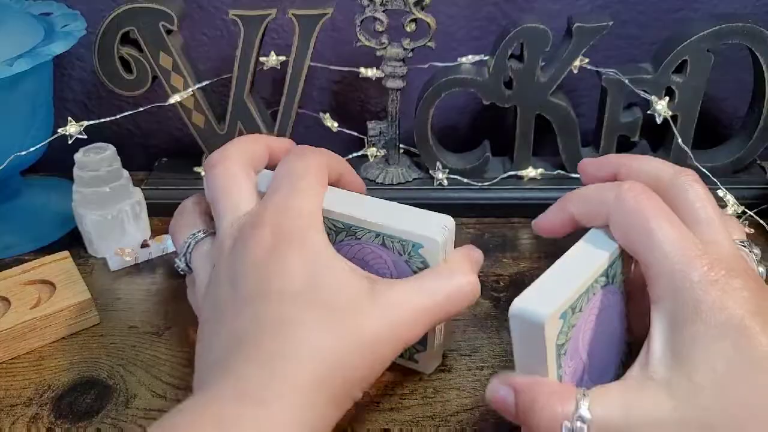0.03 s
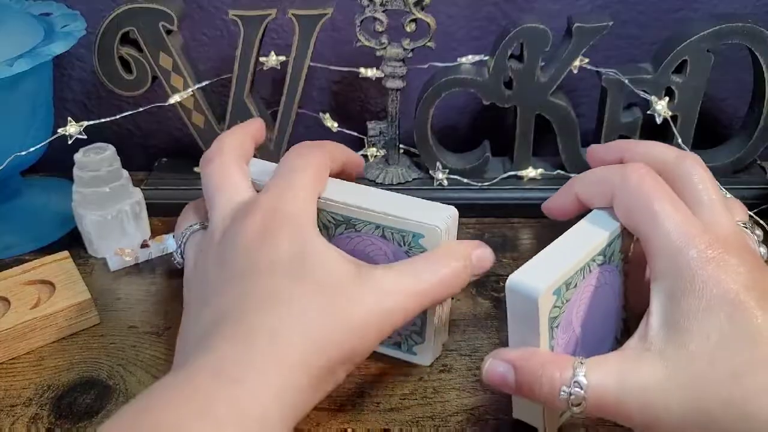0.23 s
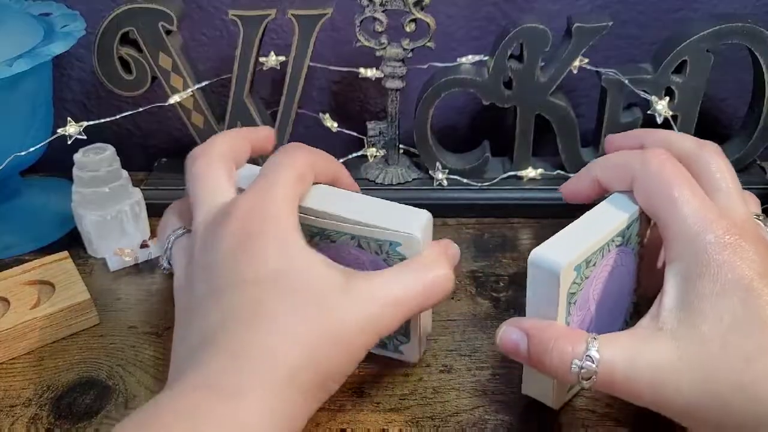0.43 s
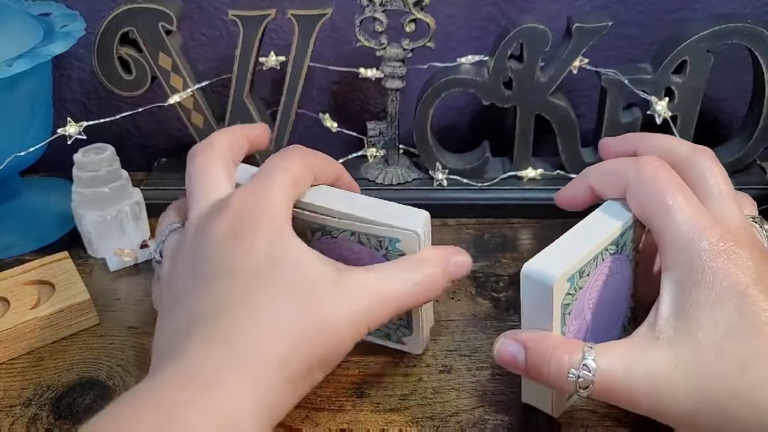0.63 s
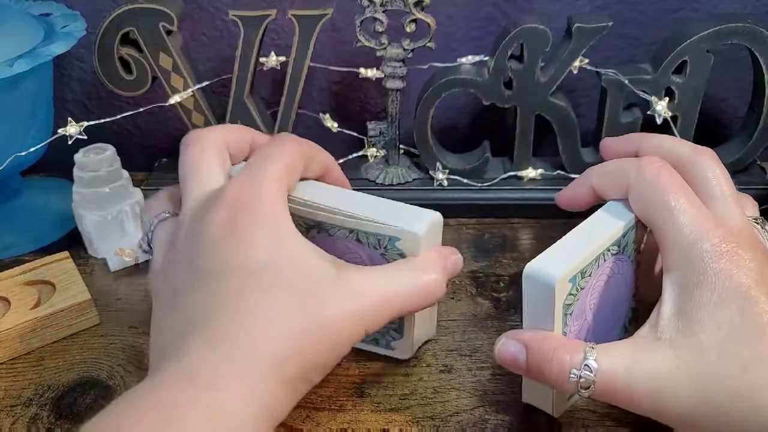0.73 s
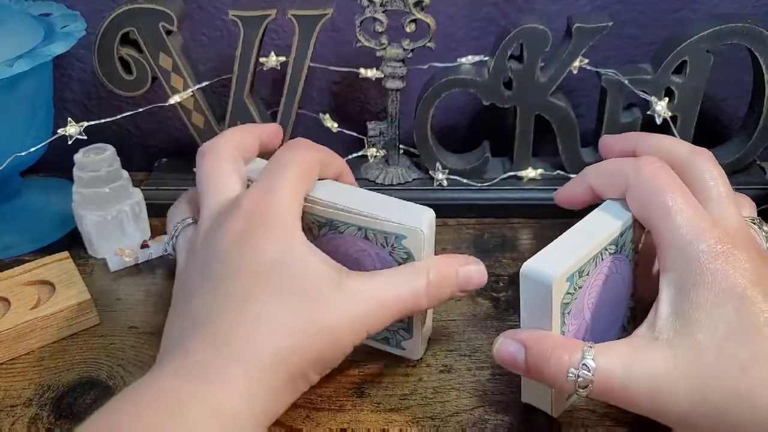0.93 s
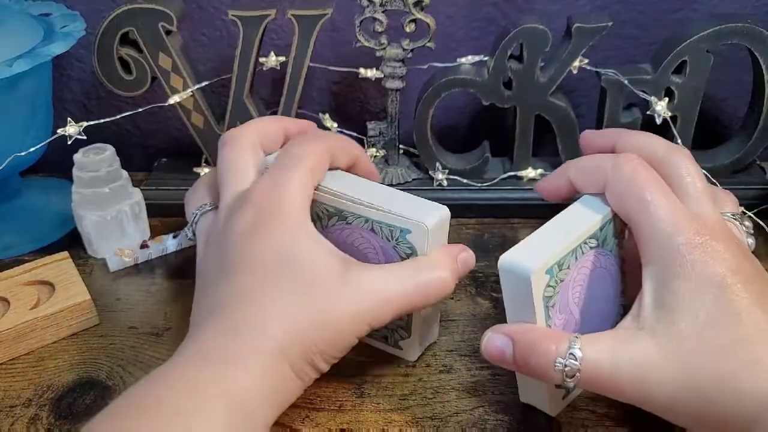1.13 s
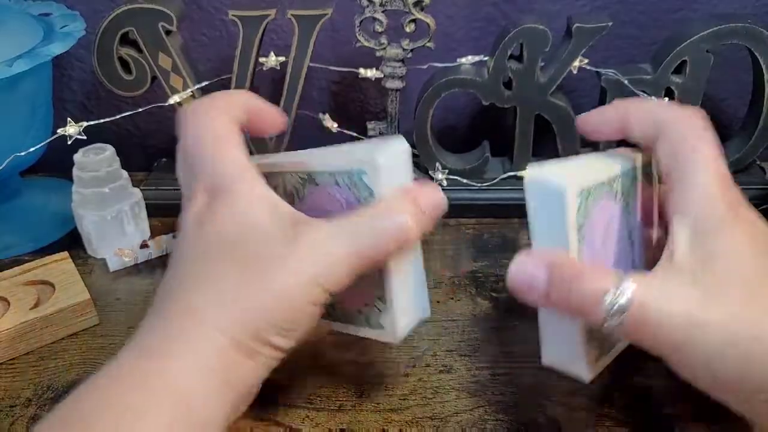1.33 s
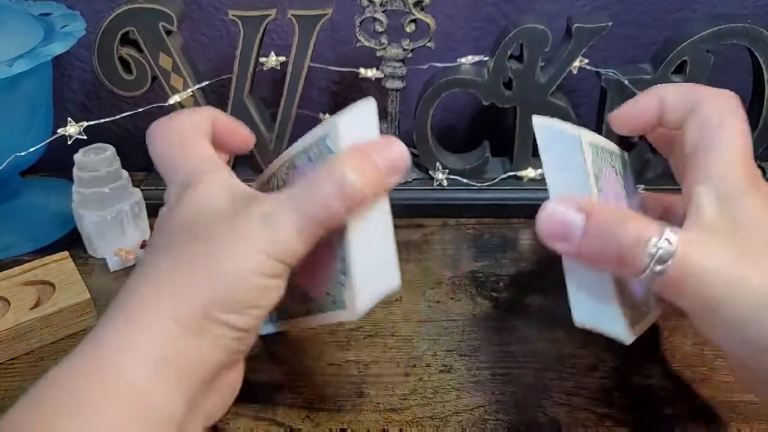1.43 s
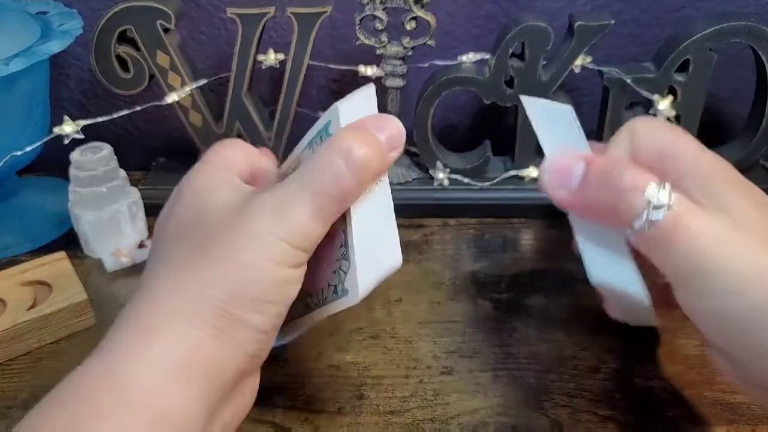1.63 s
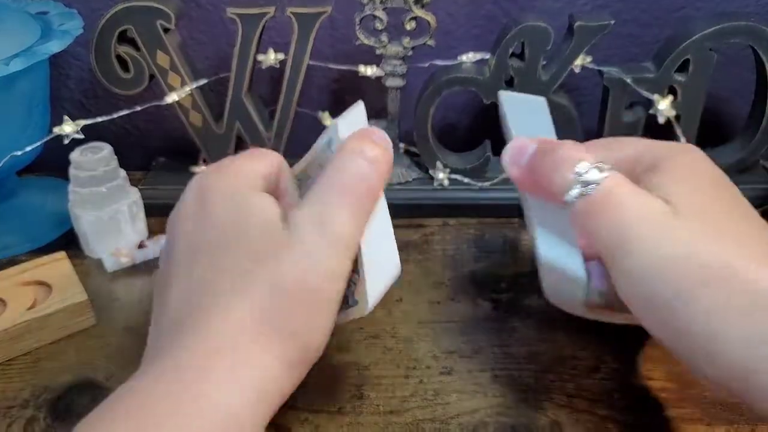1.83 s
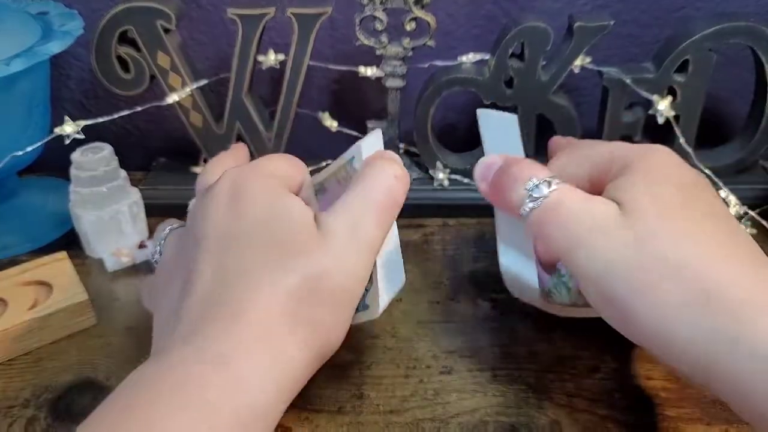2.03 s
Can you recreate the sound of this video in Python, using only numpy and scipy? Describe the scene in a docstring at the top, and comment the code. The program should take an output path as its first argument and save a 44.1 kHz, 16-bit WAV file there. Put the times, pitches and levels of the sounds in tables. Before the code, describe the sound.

Two stacks of cards are knocked on a wooden table three times in quick succession, each a bright clack with a dull thump. Fingers then shift the cards with faint rubbing and ticks, close up in a small, quiet room.

```python
"""Three knocks of two stacks of cards on a wooden table, heard close up in a small, quiet room.
Loose card edges land in a bright clack, then the squared block lands with a dull thump and the
table rings. Between the knocks, fingers shift and the cards rub, squeak, scuff and tick.
A low rumble lies underneath, and a limiter holds down the loudest peaks."""
import sys
import numpy as np
from scipy import signal
from scipy.fft import rfft, irfft, next_fast_len
from scipy.io import wavfile
from scipy.ndimage import uniform_filter1d, minimum_filter1d

SR = 44100
rng = np.random.default_rng(int(sys.argv[2]) if len(sys.argv) > 2 else 0)


def file_out(sig):
    """Save sig as 16-bit WAV at sys.argv[1]."""
    # one column per channel
    cols = np.atleast_2d(sig).T
    # limit, then scale
    lim = np.clip(cols, -1, 1)
    pcm = np.round(lim * 32767).astype(np.int16)
    wavfile.write(sys.argv[1], SR, pcm)


N = 92610  # 2.1 seconds
HIT_GAIN = np.sqrt(SR / 200)  # a hit's level counts its energy as if spread over 5 ms

# The table's ringing notes. Each row: pitch in Hz, relative level in dB, seconds to fade by 60 dB.
TABLE_NOTES = [(133, -0.5, 0.24), (173, -4, .3), (204.5, -1.5, .3), (442, 3, 0.26), (473.7, 8, 0.2),
               (562.5, 1, 0.3), (777, 0, 0.13), (1223, 6, 0.14), (1673, 2.5, 0.21), (1898, 1.5, 0.27),
               (2224, 1, 0.35), (2342, -1, 0.46), (2738, 2, 0.14), (3500, 3.5, 0.21), (6400, 0.5, .28)]
# The landings of the cards. Each row: start in seconds, level in dB, seconds over which the edges hit,
# then bass, low mids, treble, air (the highest treble), chatter and room, all in relative dB, and last
# a list of notes that the grip and the struck spot lift or damp (pitch in Hz, lift in dB).
LANDINGS = [(0.146, -38, 0.00145, 16.5, 0.5, -17, -39, -7, -8, [(1810, 7)]),
            (0.2106, -10.5, 0.0043, -1.5, -9, -0.5, -24.5, -15, -13, [(1270, 10), (1620, 0), (2480, -14),
            (3980, 8)]), (0.2541, -14.5, 0.00095, 5.5, 1.5, -15.5, -32, -0.5, -3.5, [(1230, 11.5),
            (2050, 6), (2480, 17)]), (0.588, -7.5, 0.0051, -17, -5, -0.5, -32, -26, -8.5, [(510, 6),
            (1000, -12), (2750, 4.5), (3850, 3.5)]),
            (0.6013, -11.5, 0.0062, -10, -6.5, -2.5, -17, -14.5, -6, [(1280, 5.5), (2320, 8), (3330, -2),
            (3720, 5.5)]), (0.6344, -14.5, 0.00057, 0.5, -3.5, -21.5, -29, -9.5, -8, [(1280, 14),
            (1880, -17.5), (2520, 5.5)]),
            (0.952, -13.5, 0.003, -3.5, 5.5, -2.5, -33, -8.5, -4, [(1420, 13.5), (1800, -10), (2270, -12),
            (2650, 10), (3600, 9)]), (0.962, -23.5, 0.0089, 4, 0, 3, -7.5, 1, 0, [(6130, 5)]),
            (0.9658, -10.5, 0.0015, -3.5, -6.5, 0, -32, -16.5, -7.5, [(1100, -12), (1895, 12), (3070, 6),
            (3510, 10.5)]), (0.986, -20, 0.0019, 12.5, 8.5, -0.5, -17, -27, -3.5, [(330, 11)])]


def knocks():
    """Each landing is a cluster of tiny hits that rings the cards, the table and the room."""
    out, t = np.zeros(N), np.arange(SR // 2) / SR
    graze_s, graze_db, ring_db, room_delay_s = 0.0013, -17, -55, 0.004
    for start, db, spread_s, bass, low, treble, air, chatter_db, room_db, notes in LANDINGS:
        contact = contact_pulse(bass, low, treble, air, notes, note_share=0.96)
        # The bass swells in the table and room. The room hears all sides, so the notes count less.
        radiated = contact_pulse(bass + 5.5, low, treble, air, notes, note_share=0.39)
        clack = norm(signal.fftconvolve(contact, card_edges(spread_s, chatter_db)))
        ring = sum(amp(level + rng.normal(0, 2.0) - 60 * t / fade_s) * np.sin(2 * np.pi * hz * t)
                   for hz, level, fade_s in TABLE_NOTES)
        # The lowest cards brush the wood just before the landing.
        brush = rng.standard_normal(512)[:int(graze_s * SR)]
        graze = norm(signal.fftconvolve(contact, brush * np.linspace(0, 1, len(brush))))
        gain = amp(db) * HIT_GAIN
        add(out, start - graze_s, gain * amp(graze_db) * graze)
        add(out, start, gain * clack)
        add(out, start, gain * amp(ring_db) * signal.fftconvolve(radiated, ring))
        add(out, start + room_delay_s, gain * amp(room_db) * room_echo(radiated))
    return out


def contact_pulse(bass, low, treble, air, notes, note_share):
    """One touch of cards on wood, with its own balance of low and high sound and its own notes."""
    tone = [(50, bass - 16.5), (90, bass - 8), (130, bass - 1), (200, bass - 1),
            (300, (bass + low) / 2 - 4), (480, low), (850, low), (1250, 0), (2100, 0),
            (3000, treble), (3900, treble + 1), (4550, (treble + air) / 2 + 1),
            (8000, air + 4), (13000, air - 24), (16000, air - 33)]
    return norm(stack_pulse(tone, [(hz, 73 + 0.029 * hz, note_share * lift) for hz, lift in notes]))


def card_edges(spread_s, chatter_db, size=2048):
    """Card edges hit one after another, then chatter briefly as they settle."""
    t = np.arange(size) / SR
    hits = clicks(size, per_second=5900) * (t < spread_s) * amp(-4 * t / spread_s)
    hits[0] = 1
    settle_s = 0.017
    chatter = rng.standard_normal(size) * amp(-60 * t / settle_s)
    spectrum = rfft(norm(hits) + amp(chatter_db) * norm(chatter))
    nearby_power = np.abs(uniform_filter1d(np.abs(spectrum) ** 2, size=9))
    return irfft(spectrum / np.sqrt(nearby_power))[:size // 2]  # even out the tone


# The short, hollow notes of a stack on wood. Each row: pitch in Hz, width in Hz, lift in dB.
STACK_NOTES = [(516, 180, 5), (854, 120, 8.5), (1330, 220, 1), (1795, 270, 4.5), (2133, 49, 3.5),
               (2854, 430, 2), (3920, 370, 0), (5390, 1000, 6.5)]


def stack_pulse(tone, notes=(), size=2048):
    """A sharp click with the given tone, coloured by the stack's hollow notes and any extra ones."""
    hz = np.fft.rfftfreq(size, 1 / SR)
    lifts = sum(lift * np.exp(-((hz - pitch) / width) ** 2)
                for pitch, width, lift in [*STACK_NOTES, *notes])
    # Pack the sound as early as its tone allows (this is called minimum phase).
    cepstrum = irfft(np.log(amp(along(tone, hz) + lifts)))
    cepstrum[1:size // 2] *= 2
    cepstrum[size // 2 + 1:] = 0
    return irfft(np.exp(rfft(cepstrum)))


# The wood's notes under rubbing cards. Each row: pitch in Hz, width in Hz, relative level in dB.
WOOD_NOTES = [(305.6, 22, -7), (442, 22.2, 5), (571, 54, -3), (790, 73, -10.5)]


def wood_response(hz):
    """The table answers rubbing most strongly near its own notes."""
    return sum((-1) ** k * amp(db) * 1j * hz * width / (pitch ** 2 - hz ** 2 + 1j * hz * width)
               for k, (pitch, width, db) in enumerate(WOOD_NOTES))


# The tones of fingers, card edges and card faces. Each row: frequency in Hz, relative level in dB.
THUD_TONE = [(40, -18.5), (90, -12.5), (135, 4.5), (200, 2), (290, 3.5), (420, -12), (750, -46.5),
             (2000, -72.5)]
SCRAPE_TONE = [(400, -35), (750, 4), (1000, 2), (1270, 4), (1580, 3.5), (2200, -4.5), (2450, -7.5),
               (2800, -7), (3200, -11), (4000, -17), (6000, -38)]
HISS_TONE = [(2000, -26.5), (4000, 11), (5500, 7.5), (7500, 4), (9600, 4.5), (11000, -6), (14000, -9.5),
             (16000, -25.5)]
# Strokes of fingers and cards. Each row: start in seconds (halfway up the swell), length in seconds,
# then the levels of thud, wood, scrape and hiss in dB.
STROKES = [(0, 0.023, -49, -42, -40.5, -49.5), (0.013, 0.046, -51, -45.5, -58, -61),
           (0.152, 0.042, -53, -49, -50.5, -60), (0.188, 0.049, -49, -61, -34.5, -44.5),
           (0.277, .11, -63.5, -55, -55, -59), (0.388, 0.046, -47, -33.5, -39.5, -57.5),
           (0.418, 0.0079, -62, -57, -38, -48.5), (0.435, 0.099, -61, -48.5, -59, -67),
           (0.526, 0.016, -51, -52, -53, -61), (0.582, 0.011, -70, -61, -30.5, -43),
           (0.653, 0.014, -53, -60, -26.5, -47), (0.776, 0.036, -66, -54, -44.5, -58.5),
           (0.795, 0.0047, -65, -41, -56, -46.5), (0.917, 0.016, -89, -85, -61, -52),
           (1.037, 0.012, -63, -38.5, -39, -43.5), (1.181, 0.059, -58.5, -51, -52.5, -59),
           (1.245, 0.031, -53.5, -48, -55.5, -65), (1.287, 0.012, -60, -61, -54.5, -52),
           (1.318, 0.05, -54, -44.5, -62, -90), (1.337, 0.12, -48, -43.5, -49, -62),
           (1.473, 0.035, -46, -47, -56, -66.5), (1.569, 0.034, -53, -45.5, -58, -75),
           (1.651, 0.094, -49.5, -53.5, -68.5, -82), (1.708, 0.0035, -57, -62, -54, -55),
           (1.72, 0.033, -54, -66.5, -57, -62.5), (1.804, 0.042, -48.5, -47, -52, -67),
           (1.859, 0.106, -56, -48, -57.5, -73.5), (1.967, 0.049, -60.5, -55, -66, -82.5)]


def rubbing():
    """With each stroke the fingers thud, the wood sounds, card edges scrape and card faces hiss."""
    t = np.arange(N) / SR
    layers = np.array([coloured(slips(), THUD_TONE), unit(filtered(slips(), wood_response)),
                       coloured(slips(), SCRAPE_TONE), coloured(slips(), HISS_TONE)])
    swell_share, fade_s = 0.71, 0.0026
    power = np.zeros(layers.shape)
    for start, length, *levels_db in STROKES:
        swell = np.clip((t - start) / (swell_share * length) + 0.5, 0, 1)
        fade = np.exp(-np.maximum(t - start - length, 0) / fade_s)
        power += (amp(levels_db)[:, None] * swell * fade) ** 2
    return (np.sqrt(power) * layers).sum(0)


def slips():
    """Sliding surfaces stick and slip thousands of times a second."""
    return clicks(N, per_second=7000)


# Small squeaks. Each row: start in seconds, length in seconds, pitch in Hz, level in dB.
CARD_SQUEAKS = [(0.177, 0.058, 1300, -40), (0.178, 0.05, 9550, -52), (0.583, 0.008, 9700, -47),
                (0.394, 0.045, 552, -35), (0.528, 0.013, 1440, -46), (0.763, 0.057, 775, -49.5),
                (1.025, 0.068, 1970, -39), (1.235, 0.054, 315, -50), (1.33, 0.12, 820, -48),
                (1.38, 0.076, 2670, -55)]


def squeaks():
    """A sliding card or fingertip catches and sings around one pitch, swelling and fading."""
    out, t = np.zeros(N), np.arange(N) / SR
    width_share = 0.1
    for start, length, pitch, db in CARD_SQUEAKS:
        band = unit(filtered(slips(), lambda hz: 1 / (1 + ((hz / pitch - 1) / width_share) ** 2)))
        swell = np.sin(np.pi * np.clip((t - start) / length, 0, 1))
        out += amp(db) * np.sqrt(length * SR) * norm(band * swell)
    return out


# The tone of a scuff. Each row: frequency in Hz, relative level in dB.
SCUFF_TONE = [(500, -23.5), (1100, -4), (1600, 2.5), (2300, 3.5), (3200, -3.5), (4300, -8), (5200, -18.5),
              (15000, -41)]
# Scuffs as a stack is gripped or lifted. Each row: start in seconds, length in seconds, level in dB.
EDGE_SCUFFS = [(0.529, 0.009, -47), (1.476, 0.028, -49), (1.569, 0.03, -55.5), (1.806, 0.022, -57)]


def scuffs():
    """Card edges catch one after another in a short, crisp scrape that starts at once."""
    out, t = np.zeros(N), np.arange(SR // 10) / SR
    for start, length, db in EDGE_SCUFFS:
        catches = clicks(len(t), per_second=2200) * (t < length) * amp(-5.5 * t / length)
        scuff = norm(signal.fftconvolve(stack_pulse(SCUFF_TONE), catches))
        add(out, start, amp(db) * np.sqrt(length * SR) * scuff)
    return out


# The tone of a tick. Each row: frequency in Hz, relative level in dB.
TICK_TONE = [(300, -20), (1200, 3), (3300, 8), (5500, -3), (9000, -26), (15000, -30.5)]
# Faint ticks. Each row: start in seconds, level in dB.
NAIL_TICKS = [(0.802, -38.5), (1.25, -50), (1.712, -61), (1.829, -59)]


def ticks():
    """A fingernail or a single card edge snaps against the stack."""
    out = np.zeros(N)
    for start, db in NAIL_TICKS:
        snap = signal.fftconvolve(stack_pulse(TICK_TONE), card_edges(spread_s=0.0013, chatter_db=-4))
        add(out, start, amp(db) * HIT_GAIN * norm(snap))
    return out


# How long the room rings. Each row: frequency in Hz, seconds to fade by 60 dB.
ROOM_FADES = [(100, 0.13), (260, 0.47), (700, 0.35), (1840, 0.35), (4850, 0.37), (12000, 0.26)]


def room_echo(x):
    """Echoes from the walls build up in a smooth wash, then each frequency fades at its own speed."""
    size, build_s = SR // 2, 0.0011
    walls = unit(clicks(size, per_second=1500))
    wash = amp(-1.5) * rng.standard_normal(size)
    hz, t, spectrum = signal.stft(walls + wash, SR, nperseg=256)
    fade = amp(-60 * t / along(ROOM_FADES, hz)[:, None])
    tail = signal.istft(spectrum * fade, SR, nperseg=256)[1]
    build = 1 - np.exp(-np.arange(len(tail)) / SR / build_s)
    return signal.fftconvolve(x, norm(tail * build))


# The tone of the quiet room. Each row: frequency in Hz, relative level in dB.
RUMBLE_TONE = [(25, -22), (60, 11), (85, -8), (150, -5), (450, -16.5), (1000, -17), (4000, -28.5),
               (10000, -32.5), (15000, -46)]


def room_rumble():
    """A faint, steady, low noise fills the room."""
    return amp(-59.5) * coloured(rng.standard_normal(N), RUMBLE_TONE)


def clicks(size, per_second):
    """Tiny clicks of uneven strength at random times."""
    return rng.standard_normal(size) * (rng.random(size) < per_second / SR)


def amp(db):
    """Turn decibels into a number to multiply by."""
    return 10 ** (np.asarray(db) / 20)


def unit(x):
    """Scale a sound so its average power is 1."""
    return x / np.sqrt(np.mean(x ** 2) + 1e-20)


def norm(x):
    """Scale a sound so its total energy is 1."""
    return x / (np.linalg.norm(x) + 1e-12)


def along(points, hz):
    """Read between (Hz, value) points, with octaves evenly spaced."""
    frequencies, values = np.transpose(points)
    return np.interp(np.log(hz + 1), np.log(frequencies + 1), values)


def filtered(x, response):
    """Turn each frequency up or down by response(hz)."""
    size = next_fast_len(N + SR // 2)
    return irfft(rfft(x, size) * response(np.fft.rfftfreq(size, 1 / SR)), size)[:N]


def coloured(x, tone):
    """Give a sound a tone made of (Hz, dB) points, at an average power of 1."""
    return unit(filtered(x, lambda hz: amp(along(tone, hz))))


def add(track, start_s, x):
    """Mix a sound into the track at the given time."""
    i = max(round(start_s * SR), 0)
    track[i:i + len(x)] += x[:N - i]


def scene():
    """Knocks, ticks and handling sounds over the room's rumble, in one channel."""
    hits = knocks() + ticks()
    handling = rubbing() + squeaks() + scuffs()
    handling_echo = amp(-8) * room_echo(handling)[:N]
    return (hits + handling + handling_echo + room_rumble())[None]


def record(dry):
    """A fast limiter turns the peaks down, then the very lowest and highest sounds are cut."""
    ceiling_db, hold_s, low_cut_hz, top_hz = -3.5, 0.0083, 31, 15880
    hold = int(hold_s * SR)
    needed_gain = np.minimum(1, amp(ceiling_db) / (np.abs(dry[0]) + 1e-9))
    gain = uniform_filter1d(minimum_filter1d(needed_gain, hold), hold)
    low_cut = signal.butter(2, low_cut_hz, 'high', fs=SR, output='sos')
    return filtered(signal.sosfilt(low_cut, dry[0] * gain), lambda hz: hz < top_hz)[None]


dry = scene()
out = record(dry)
file_out(out)
```